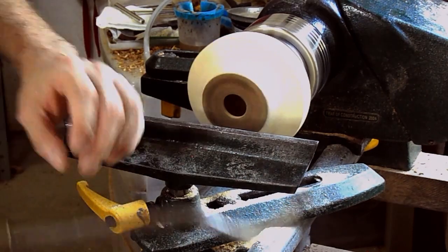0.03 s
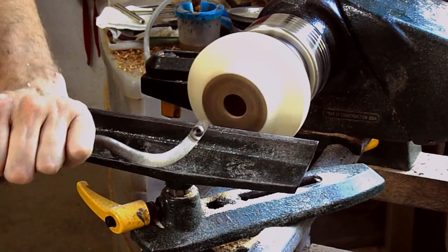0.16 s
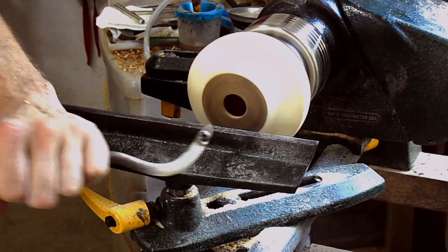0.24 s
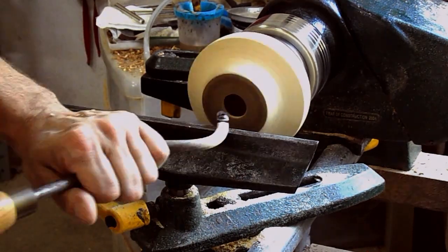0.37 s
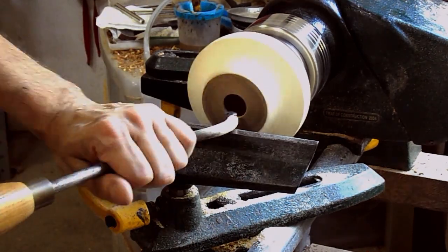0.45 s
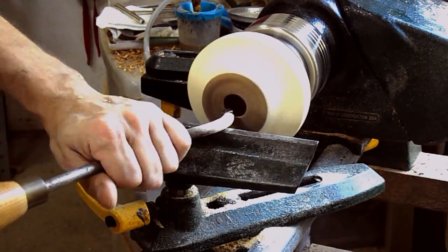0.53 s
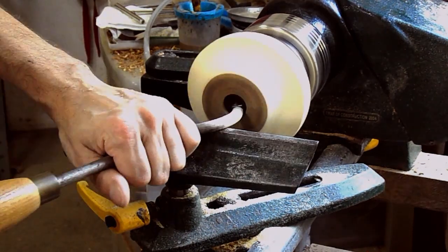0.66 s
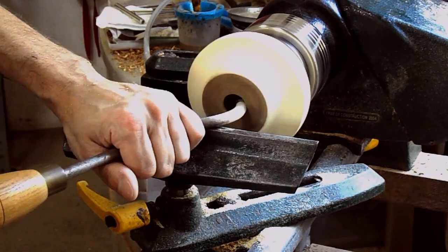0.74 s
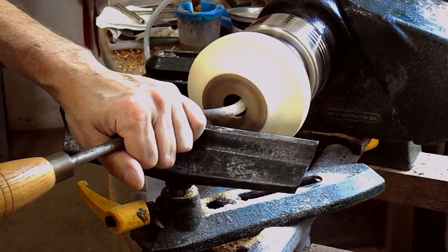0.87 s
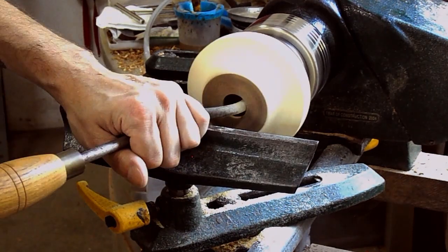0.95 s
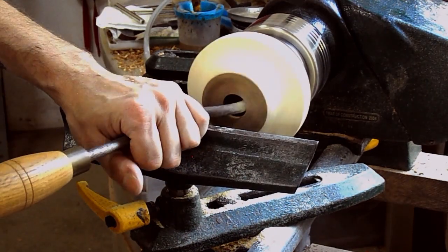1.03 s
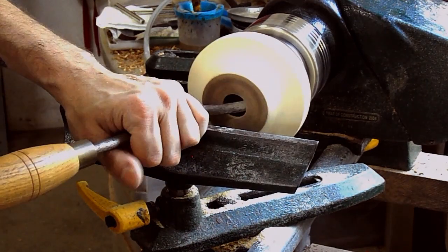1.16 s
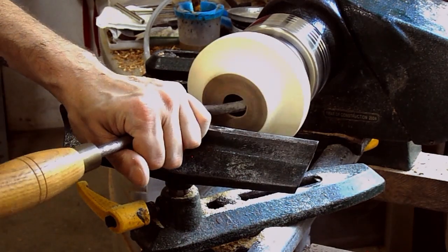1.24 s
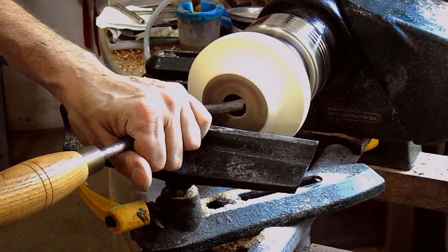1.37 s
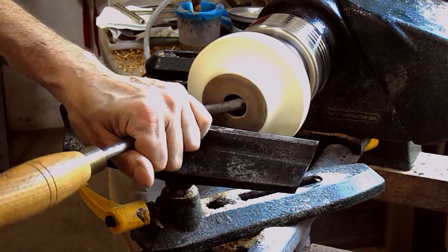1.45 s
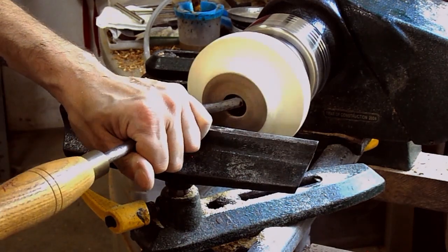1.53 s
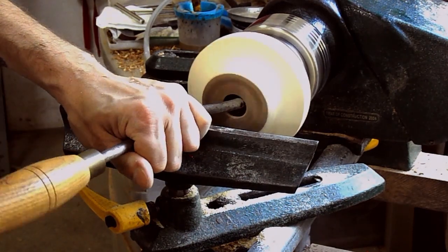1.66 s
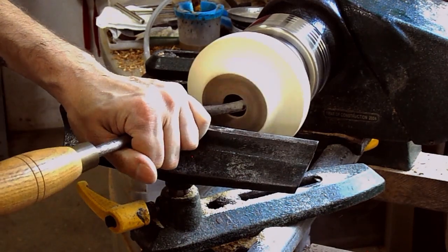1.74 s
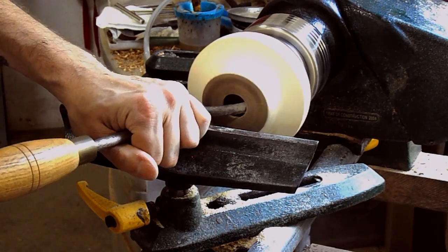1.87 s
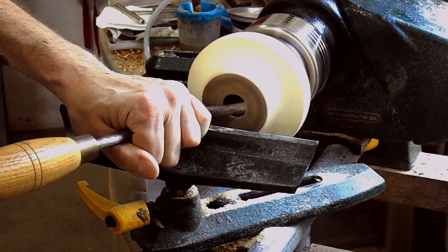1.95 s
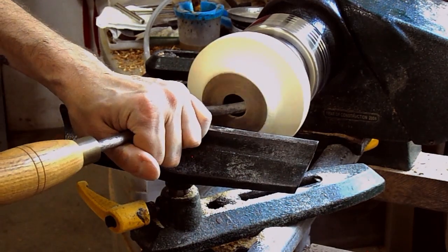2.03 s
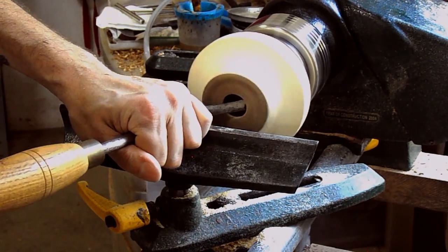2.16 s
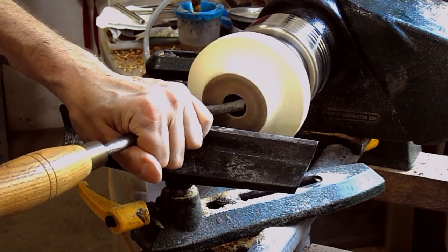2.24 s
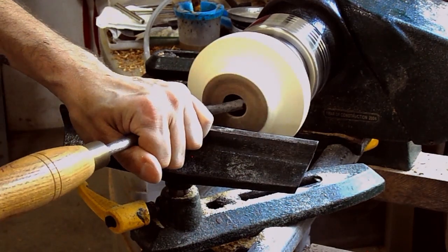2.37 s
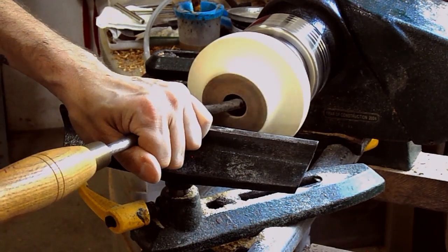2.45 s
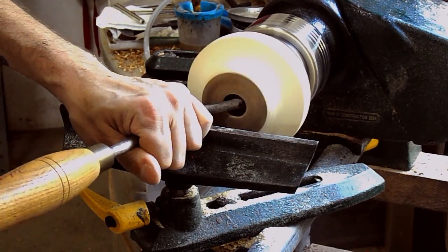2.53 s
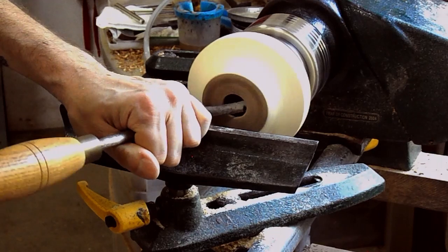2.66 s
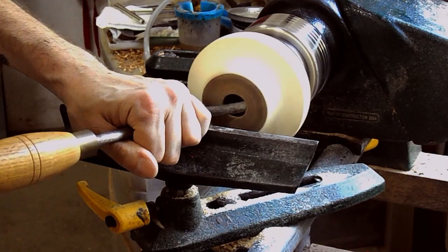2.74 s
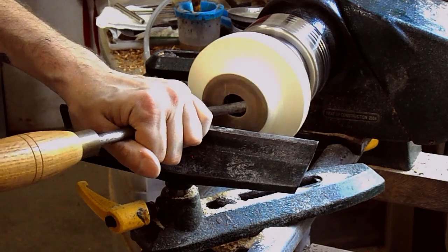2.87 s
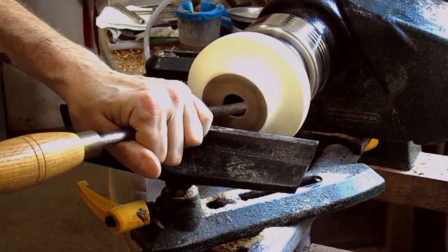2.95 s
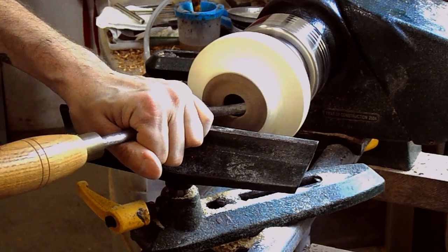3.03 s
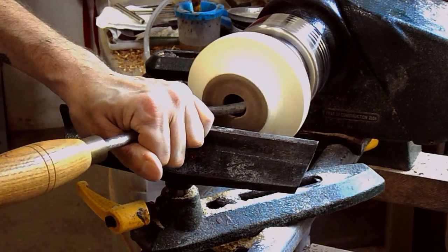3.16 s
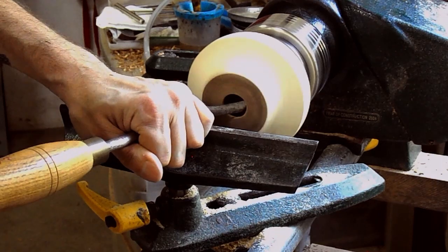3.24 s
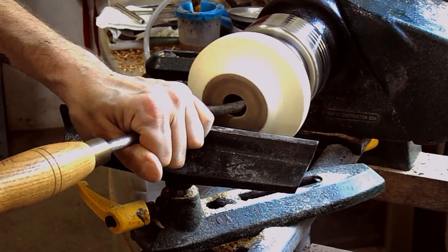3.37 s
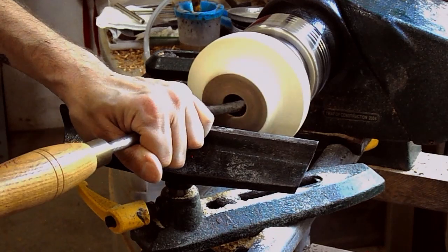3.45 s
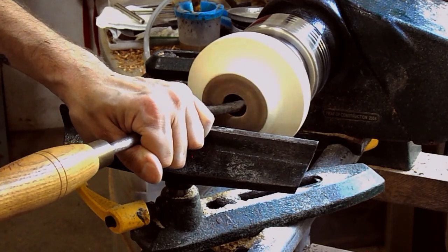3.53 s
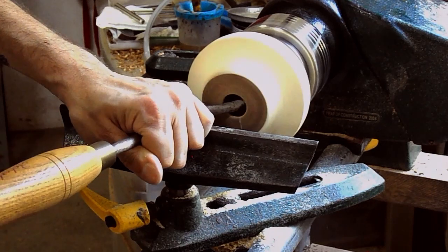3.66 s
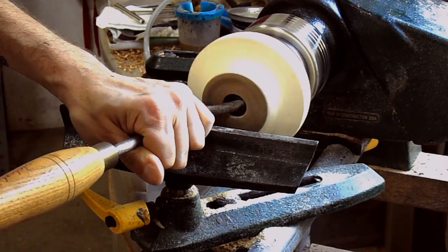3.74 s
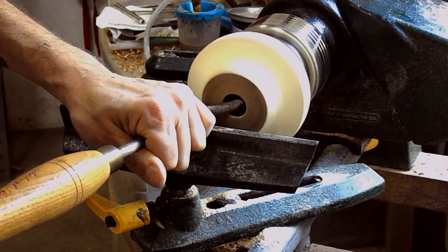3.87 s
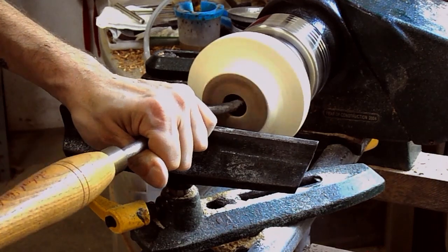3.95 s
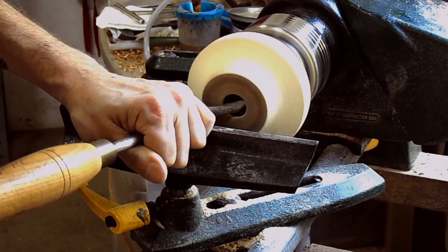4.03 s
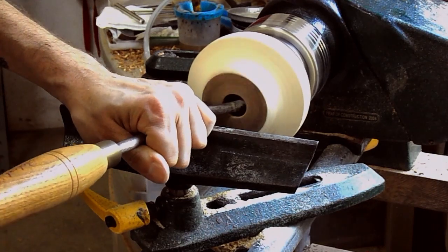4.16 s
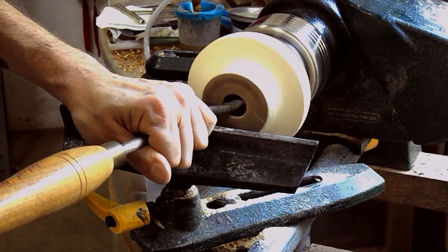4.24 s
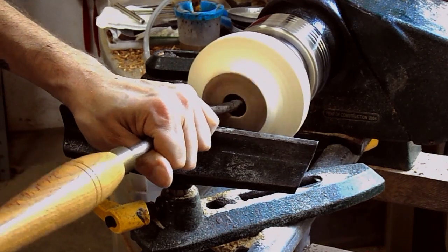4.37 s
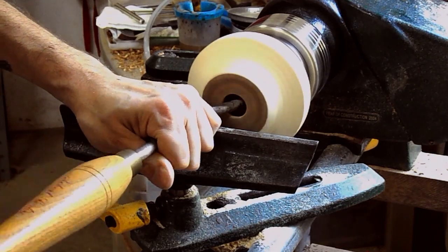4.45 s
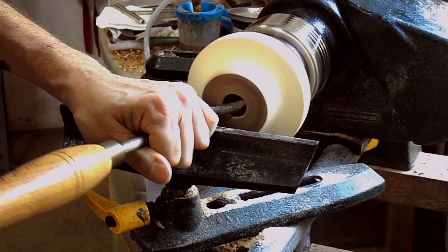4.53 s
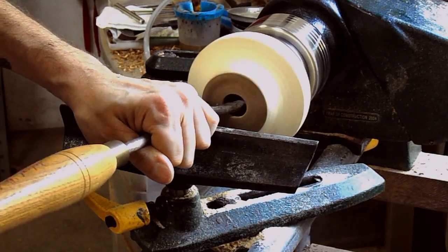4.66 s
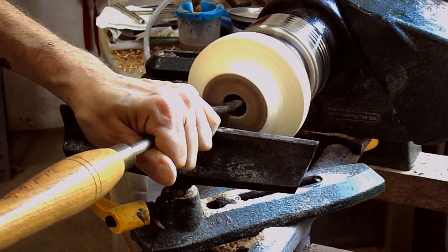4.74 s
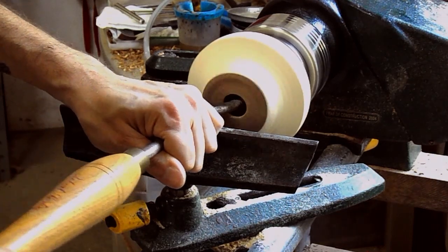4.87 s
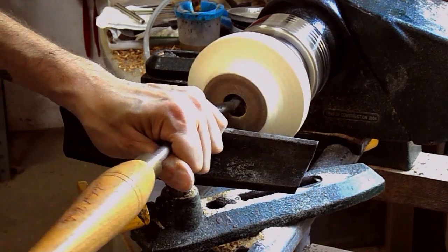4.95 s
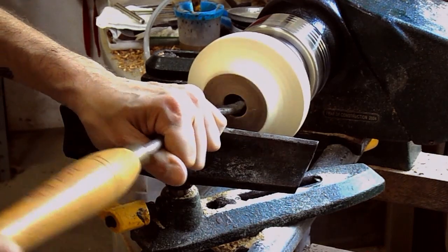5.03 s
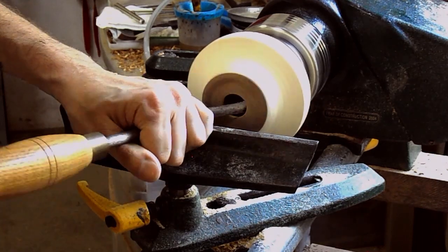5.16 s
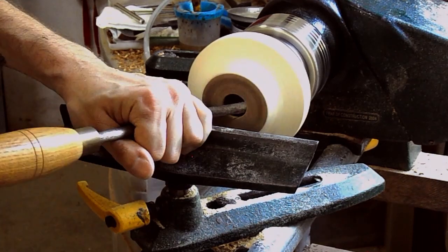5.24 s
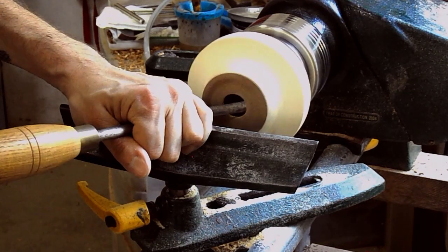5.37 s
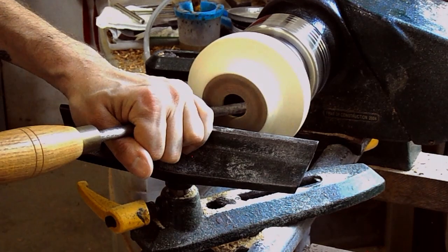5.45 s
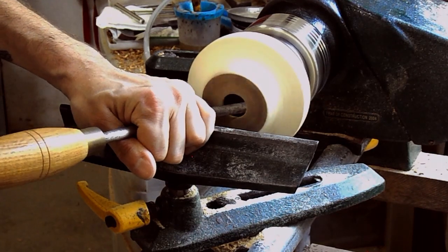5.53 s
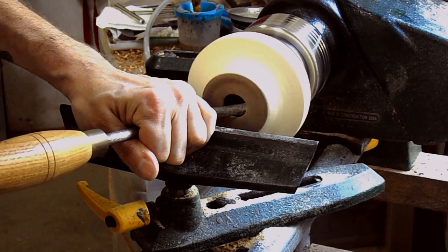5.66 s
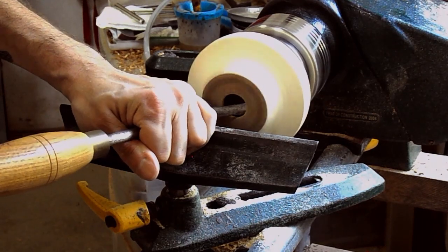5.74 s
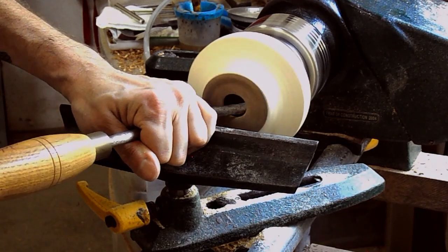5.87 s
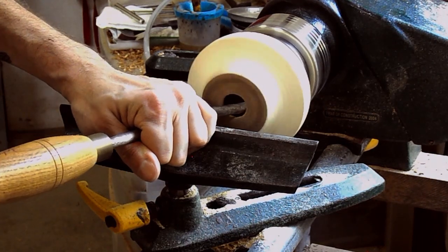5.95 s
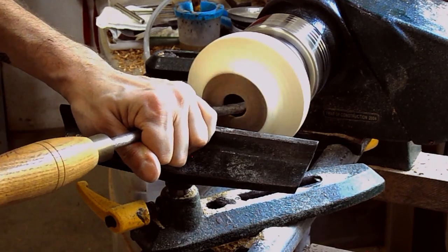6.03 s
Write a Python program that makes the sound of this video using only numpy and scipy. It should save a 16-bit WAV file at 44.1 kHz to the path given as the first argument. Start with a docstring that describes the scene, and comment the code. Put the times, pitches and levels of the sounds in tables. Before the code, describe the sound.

A lathe whirrs steadily while a steel scraper hollows spinning wood in five harsh, rasping, metallic-ringing cuts, with softer rubbing between and after.

```python
"""A hooked steel scraper hollows a wooden vessel spinning on a lathe in a small workshop.
The edge tears fibres in five cuts: dense random snaps that throb with the grain on every turn and ring the steel.
Shavings hiss, chips crackle, the vessel drones and the tool shank chatters through resonances.
Before the third cut and after the last, the tip rubs the wall with a dull rasp; brief notes sing out.
Filtered noise and one thin wavering note make the drive and bearings whirr throughout."""
import sys
import numpy as np
from scipy import signal
from scipy.fft import rfft, irfft, next_fast_len
from scipy.io import wavfile
from scipy.ndimage import uniform_filter1d

SR = 44100
rng = np.random.default_rng(int(sys.argv[2]) if len(sys.argv) > 2 else 0)


def wrap_up_sound(samples):
    """Save the sound to the file named by the first command line argument, as 16-bit audio."""
    columns = np.atleast_2d(samples).T
    # keep every value between -1 and 1, then stretch to whole-number steps
    tamed = np.clip(columns, -1, 1)
    steps = np.round(tamed * 32767).astype(np.int16)
    wavfile.write(sys.argv[1], SR, steps)


N = 268993
TIME = np.arange(N) / SR
SIZE = next_fast_len(N + SR // 2)   # room for the reverb tail
HZ = np.maximum(np.arange(SIZE // 2 + 1) * SR / SIZE, 1)


def from_db(db):
    """Decibels to gain."""
    return 10 ** (np.asarray(db) / 20)


def rms_one(x):
    """Scale to unit power."""
    return x / np.sqrt(np.mean(x ** 2) + 1e-20)


def level(rows, axis=1):
    """Gain in time from a dB column, silent outside its span."""
    rows = np.array(rows)
    inside = (TIME >= rows[:, 0].min()) & (TIME <= rows[:, 0].max())
    return from_db(np.interp(TIME, rows[:, 0], rows[:, axis])) * inside


def at_hz(points):
    """A table joined by straight lines on a log-frequency axis."""
    hz, value = np.transpose(points)
    return np.interp(np.log(HZ), np.log(hz), value)


def filtered(x, response):
    """Pass a signal through a frequency response."""
    return irfft(rfft(x, SIZE) * response, SIZE)[..., :N]


def band(x, low_hz, high_hz, order=2):
    """Causal band-pass."""
    edges = [low_hz, min(high_hz, SR / 2 - 1)]
    return signal.sosfilt(signal.butter(order, edges, "band", fs=SR, output="sos"), x)


def drift(rate):
    """Slow random wander of unit power, smoothed above the rate in Hz."""
    step = 40   # samples between the points of the wander
    r = np.exp(-2 * np.pi * rate * step / SR)
    noise = rng.standard_normal(N // step + 2002)
    slow = signal.lfilter([1], [1, -2 * r, r * r], noise)[2000:]   # drop the settling
    return np.interp(np.arange(N) / step, np.arange(len(slow)), rms_one(slow))


def resonate(force, modes):
    """Parallel resonances with steep skirts; noise shaped by the force drives each one separately."""
    out = 0
    for hz, width_hz, db in modes:
        r = np.exp(-np.pi * width_hz / SR)
        gain = (1 - r * r) / 2
        section = [gain, 0, -gain, 1, -2 * r * np.cos(2 * np.pi * hz / SR), r * r]
        drive = force * rng.standard_normal((2, N))
        out = out + from_db(db) * signal.sosfilt([section, section], drive)
    return out


def steadied(x, span_s, share):
    """Friction limits a vibration: a share of its swells is evened out; unit power."""
    power = uniform_filter1d(x ** 2, size=max(int(span_s * SR), 1))
    return rms_one(x / np.maximum(power, 1e-20) ** (share / 2))


def snaps(per_s, spread_db):
    """Fibres break at random moments; a positive spread makes a few much stronger, a negative one weaker."""
    sizes = from_db(spread_db * np.minimum(rng.exponential(1, N), 3))
    return rms_one(sizes * (rng.random(N) < per_s / SR)) + 1e-9


def scattered(force, response):
    """Snaps reach each side with a sign of their own and take on a colour; unit power."""
    return rms_one(filtered(force * rng.choice([-1, 1], (2, N)), response))


def bursts(rows, length_s, rise_s):
    """Gain in time of sudden onsets that lose 20 dB over their length."""
    gain = np.zeros(N)
    for s, db in rows:
        age = np.maximum(TIME - s + rise_s, 0)
        gain += from_db(db - 20 * age / length_s) * np.minimum(age / rise_s, 1)
    return gain


def swells(rows):
    """Gain in time of touches that rise and fade evenly about their middle."""
    gain = 0
    for s, length_s, db in rows:
        gain = gain + from_db(db) * np.cos(np.pi * np.clip((TIME - s) / length_s, -.5, .5))
    return gain


# headstock and bed resonances: f/Hz, width of each of two filter passes/Hz, relative level/dB
HEADSTOCK_MODES = [(165, 50, -18.5), (263, 30, -8.5), (325, 32, -5), (358, 45, -1), (395, 50, -6.5),
                   (446, 22, 2), (480, 50, -11), (552, 55, -8), (655, 45, -11.5), (757, 35, -10),
                   (850, 60, -10), (940, 80, -6), (984, 22, -1), (1043, 42, -2), (1200, 120, -19),
                   (1500, 130, -23), (1760, 110, -17), (1930, 110, -13), (2080, 90, -14), (2450, 90, -26),
                   (2680, 90, -27), (3400, 110, -24), (3620, 70, -21), (4020, 70, -19), (4160, 120, -14.5),
                   (4330, 80, -19), (4520, 180, -17), (4720, 140, -21)]
# bearing and air hiss: f/Hz, relative density/dB
HISS_COLOUR = [(60, -30), (150, -10.5), (500, 6), (1200, 7.5), (1500, 7), (2400, 2), (3400, 1.5), (4800, 3),
               (5500, 2.5), (6400, 4), (8500, 2), (11500, 0), (13300, -3), (15500, -3)]
# the running lathe swells and sinks, whine included: t/s, level offset/dB
LATHE_SWELL = [(0, 2), (.25, -2), (.4, 2), (.5, -2), (.62, 2.5), (.77, -3), (.9, 0.5), (1.28, 2),
               (1.78, -2), (2.05, 2), (2.75, 0), (5.25, -1.5), (6.1, 1.5)]
WHIRR_DB, HISS_DB, RUMBLE_DB = -41.5, -45, -69.0


def lathe():
    """The drive shakes the headstock; bearings and stirred air hiss over a faint uneven rumble."""
    shaking = resonate(from_db(2.4 * drift(17)), HEADSTOCK_MODES)
    whirr = steadied(shaking, span_s=0.14, share=0.7)
    hiss = rms_one(filtered(rng.standard_normal((2, N)), from_db(at_hz(HISS_COLOUR))))
    rumble = rms_one(band(rng.standard_normal((2, N)), low_hz=30, high_hz=150))
    return (whirr * from_db(WHIRR_DB + np.interp(TIME, *np.transpose(LATHE_SWELL)))
            + hiss * from_db(HISS_DB + .5 * drift(22))
            + rumble * from_db(RUMBLE_DB + 4.3 * drift(6.7)))


# thin drive note: f/Hz, level/dB, pitch waver/Hz
DRIVE_WHINE = (984, -49.5, 1.93)


def whining():
    """One thin note from the drive, wavering separately in level and phase on each side."""
    hz, db, waver_hz = DRIVE_WHINE
    phase = 2 * np.pi * np.cumsum(hz + waver_hz * drift(5.6)) / SR
    sides = [from_db(2.5 * drift(9)) * np.sin(phase + .7 * drift(3)) for side in range(2)]
    return from_db(db + np.interp(TIME, *np.transpose(LATHE_SWELL))) * np.array(sides)


SHOP_T60_S = 0.12


def workshop(x, wet_db):
    """Dense, short reflections from the machine and the close walls, unlike on the two sides."""
    age = TIME[:SR // 2]
    tail = rng.standard_normal((2, len(age))) * from_db(-60 * age / SHOP_T60_S) * (age > .002)
    tail /= np.sqrt(np.sum(tail ** 2, axis=1, keepdims=True))
    dulled = rfft(tail, SIZE) / np.hypot(1, HZ / 9000)
    return x + from_db(wet_db) * filtered(x, dulled)


TURNS_PER_S = 16.6
# hard and soft grain around the wall: throb depth/dB at one, two, three and four times a turn
GRAIN_THROB = [0.96, 0.75, 1, 0.94]


def wall_grain(uneven_db):
    """The pressure on the edge repeats with each turn, and never quite alike."""
    turn = 2 * np.pi * np.cumsum(TURNS_PER_S * (1 + 0.015 * drift(4.4))) / SR
    pattern = 0
    for k, db in enumerate(GRAIN_THROB, 1):
        pattern = pattern + db * np.cos(k * turn + rng.uniform(0, 2 * np.pi))
    return rms_one(from_db(pattern + uneven_db * drift(67)))


# five cuts, and how hard the edge bites in each: t/s, bite level/dB
CUT_BITES = [
    [(1.34, -60), (1.368, -37), (1.402, -32.5), (1.412, -41.5), (1.452, -25.5), (1.522, -27.5),
     (1.538, -38.5), (1.564, -38.5), (1.616, -26), (1.638, -38.5), (1.68, -34.5), (1.72, -81)],
    [(2.2, -48), (2.23, -36), (2.256, -44), (2.266, -28), (2.314, -35.5), (2.324, -27), (2.35, -35.5),
     (2.406, -27.5), (2.494, -27.5), (2.5, -27.5), (2.602, -28), (2.66, -61)],
    [(3.41, -60), (3.446, -25.5), (3.452, -31.5), (3.704, -26.5), (3.738, -30.5), (3.766, -24.5),
     (3.79, -29.5), (3.894, -24.5), (3.92, -32.5), (3.958, -25.5), (4.038, -44.5), (4.06, -74)],
    [(4.11, -67), (4.122, -42), (4.166, -26), (4.202, -33), (4.252, -25.5), (4.374, -28.5), (4.404, -33),
     (4.416, -30.5), (4.434, -35), (4.538, -38.5), (4.59, -81)],
    [(4.61, -54), (4.638, -34.5), (4.652, -27.5), (4.66, -30), (4.762, -24.5), (4.814, -32), (4.834, -28.5),
     (4.884, -33), (5.002, -39.5), (5.07, -87)],
]
# one row a cut: vessel hum trim/dB, shank chatter trim/dB, shavings trim/dB,
# growth of rasp and shavings as the handle swings/(dB per s)
CUT_TRIMS = [(-2, 1.5, -2.5, 24), (2.5, 0.5, -1.5, 2), (-0.5, 1, -1.5, 4), (0.5, -1, 2, 18),
             (0, -1, 3.5, 26)]
FULL_BITE_DB = -23


def bite(follows, trims_db=0, growths_db_per_s=0):
    """Gain growing as a power of the bite, 1 at full bite; each cut may trim it and tilt it about its middle."""
    trims_db = np.broadcast_to(trims_db, len(CUT_BITES))
    growths_db_per_s = np.broadcast_to(growths_db_per_s, len(CUT_BITES))
    gain = 0
    for cut, trim_db, growth in zip(CUT_BITES, trims_db, growths_db_per_s):
        middle_s = (cut[0][0] + cut[-1][0]) / 2
        strength = (level(cut) / from_db(FULL_BITE_DB)) ** follows
        gain = gain + strength * from_db(trim_db + growth * (TIME - middle_s))
    return gain


# the tip glides on the wall, before the trims below: t/s, friction level/dB, knocking level/dB
WALL_RUBS = [
    [(2.82, -70, -65), (2.856, -47, -38), (3.092, -48, -34.5), (3.178, -51, -49), (3.194, -51, -45),
     (3.21, -53, -61), (3.272, -46, -37.5), (3.426, -39, -33), (3.45, -51, -51)],
    [(5.33, -59, -49.5), (5.394, -41.5, -33.5), (5.456, -37, -39), (5.5, -43.5, -34), (5.876, -43.5, -35.5),
     (5.922, -47.5, -47), (5.978, -47.5, -42.5), (6.068, -48, -64), (6.1, -48, -49)],
]
RUB_RASP_DB, RUB_DUST_DB, RUB_DRONE_DB, RUB_CHATTER_DB = 1, -5.5, -0.5, -10


def gliding():
    """Gains of the friction and of the knocking while the tip glides on the wall."""
    return [sum(level(rub, axis=k) for rub in WALL_RUBS) for k in (1, 2)]


# brief notes, each in one resonance: middle t/s, length/s, f/Hz, width/Hz, level/dB
SUNG_NOTES = [(.39, .028, 3500, 700, -45), (1.617, .045, 3730, 90, -32), (2.915, .045, 3420, 260, -47),
              (3.805, .14, 4320, 45, -31), (4.504, .08, 2560, 500, -37), (4.786, .21, 4335, 25, -35),
              (4.98, .12, 2550, 330, -40), (5.4, .1, 261, 22, -36), (5.455, .05, 3150, 450, -33),
              (5.477, .14, 329, 26, -33), (5.675, .13, 323, 20, -35), (5.7, .28, 536, 14, -39),
              (5.704, .09, 640, 16, -39), (5.833, .23, 420, 11, -27), (5.989, .12, 421, 7, -35)]


def singing():
    """Sticking and slipping makes tool or vessel sing: notes swell and fade, uneven slips waver the pitch."""
    out = np.zeros((2, N))
    for s, length_s, hz, width_hz, db in SUNG_NOTES:
        on = np.abs(TIME - s) < length_s / 2
        age = TIME[on] - s
        phase = 2 * np.pi * np.cumsum(hz + width_hz / 2 * drift(width_hz)[on]) / SR
        paths = rng.uniform(0, 2 * np.pi, (2, 1))   # a phase of its own on each side
        out[:, on] += from_db(db) * np.cos(np.pi * age / length_s) * np.sin(phase + paths)
    return out


SETTLE_S = 0.059   # averaging time of the load


def settled(gain):
    """A load evened out by the inertia of the vessel and the tool."""
    return uniform_filter1d(gain, size=max(int(SETTLE_S * SR), 1))


# hollow vessel resonances: f/Hz, width of each of two filter passes/Hz, relative level/dB
VESSEL_MODES = [(226, 34, -14.5), (260, 66, -3.5), (290.5, 65, -5.5), (338, 49, 1), (362, 41, -7.5),
                (410, 96, -2), (481, 99, -5), (550, 43, -1), (660, 53, -4), (760.4, 31, -5.5),
                (856, 150, -12), (961.4, 55, -2), (1130, 190, -20), (1155, 37, -10), (1250, 31, -6)]
# overhanging tool shank resonances: same columns
SHANK_MODES = [(417, 26, 0), (434, 26, 0), (455, 40, -5)]
# the tip feels for the wall and the vessel hums: middle t/s, length/s, level/dB
WALL_GRAZES = [(1.28, 0.12, -45), (2.06, 0.21, -43.5), (2.21, .13, -47.5)]
# level at full bite before trims/dB, and dB gained per dB of bite
DRONE_DB, DRONE_FOLLOWS = -31, 0.7
CHATTER_DB, CHATTER_FOLLOWS = -26, 1


def droning(grain):
    """Bumps in the wall knock the vessel and set the overhanging shank chattering."""
    force = grain * snaps(per_s=900, spread_db=4.0)
    vessel = steadied(resonate(force, VESSEL_MODES), span_s=.04, share=0.85)
    shank = steadied(resonate(force, SHANK_MODES), span_s=0.018, share=0.65)
    _, knocking = gliding()
    hums_db, chatters_db, *_ = np.transpose(CUT_TRIMS)
    drone = from_db(DRONE_DB) * settled(bite(DRONE_FOLLOWS, hums_db))
    drone = drone + from_db(RUB_DRONE_DB) * knocking + swells(WALL_GRAZES)
    chatter = from_db(CHATTER_DB) * settled(bite(CHATTER_FOLLOWS, chatters_db))
    chatter = chatter + from_db(RUB_CHATTER_DB) * knocking
    return drone * vessel + chatter * shank


# colour of the rubbing tip: f/Hz, relative density/dB
FRICTION_COLOUR = [(200, -32), (500, -18), (900, 7.5), (1450, 4.5), (2100, 7.5), (2400, 4.5), (3100, 4),
                   (3900, -13), (4900, -2), (5400, -6), (5900, 4.5), (7500, -18), (10000, -18),
                   (15500, -28)]
# dry scratch of a skipping tip: f/Hz, relative density/dB
SCRATCH_COLOUR = [(1200, -41), (2100, -7), (2600, -2.5), (3200, 1.5), (3800, -1), (5000, -10), (7800, -9.5),
                  (10000, -39)]
# the tip skips and scuffs the wood, also as it leaves a cut: middle t/s, length/s, level/dB
TIP_SCUFFS = [(3.362, 0.032, -33.5), (4.5, 0.1, -44), (4.95, 0.14, -54), (5.4, 0.085, -43),
              (5.455, 0.037, -39), (5.785, 0.049, -39), (5.81, .018, -34.5), (5.862, 0.032, -31),
              (5.889, .018, -35)]
RASP_DB, RASP_FOLLOWS = -35, 0.55   # at full bite mid-cut/dB, dB gained per dB of bite


def rubbing(grain):
    """The tip and loose shavings slide over the wall with a dull rasp; where the tip skips it scratches."""
    force = grain * snaps(per_s=6000, spread_db=3)
    rasp = scattered(force, from_db(at_hz(FRICTION_COLOUR)))
    scratch = scattered(force, from_db(at_hz(SCRATCH_COLOUR)))
    friction, _ = gliding()
    *_, swings = np.transpose(CUT_TRIMS)
    pressure = from_db(RASP_DB) * bite(RASP_FOLLOWS, growths_db_per_s=swings)
    pressure = pressure + from_db(RUB_RASP_DB) * friction
    return pressure * rasp + swells(TIP_SCUFFS) * scratch


# the edge catches and frees a chip: end of rise t/s, level before decay/dB
CHIP_CATCHES = [(1.452, -18), (2.264, -37), (2.42, -23.5), (2.473, -18), (2.558, -20), (3.7614, -25.5),
                (3.898, -27), (4.6366, -25)]
# a flying splinter ticks against metal: same columns
SPLINTER_TICKS = [(4.152, -22)]
CHIP_S, TICK_S = 0.032, .004   # time to lose 20 dB


def chips():
    """Each catch is a short burst of sparser snaps; a splinter gives a tiny bright tick."""
    colour = from_db(at_hz(TEAR_COLOUR)) / np.hypot(1, 1800 / HZ)   # thinner below 1800 Hz
    crackle = scattered(snaps(per_s=1700, spread_db=-1.0), colour)
    tick = rms_one(band(rng.standard_normal((2, N)), low_hz=11000, high_hz=16000))
    return (bursts(CHIP_CATCHES, CHIP_S, rise_s=0.002) * crackle
            + bursts(SPLINTER_TICKS, TICK_S, rise_s=.0005) * tick)


# colour of spraying shavings: f/Hz, relative density/dB
SHAVINGS_COLOUR = [(1000, -24), (4000, 13), (6000, -43), (8500, 0.5), (10000, 5), (12000, 5), (13500, 3),
                   (15500, 1)]
SPRAY_DB, SPRAY_FOLLOWS = -32, 0.93   # at full bite before trims/dB, dB gained per dB of bite
SPRAY_SNAPS_PER_S = 14000
WHIRL_S = .04   # time constant of shavings staying in the hollow


def spraying(grain):
    """Fine shavings of similar size hiss off the edge and whirl in the hollow; rubbing stirs a little dust."""
    force = grain * snaps(SPRAY_SNAPS_PER_S, spread_db=1)
    keep = np.exp(-1 / (WHIRL_S * SR))
    _, _, shavings_db, swings = np.transpose(CUT_TRIMS)
    thrown = bite(SPRAY_FOLLOWS, shavings_db, swings)
    whirling = signal.lfilter([1 - keep], [1, -keep], thrown)
    friction, _ = gliding()
    flow = from_db(SPRAY_DB) * np.sqrt(thrown * whirling) + from_db(RUB_DUST_DB) * friction
    return flow * scattered(force, from_db(at_hz(SHAVINGS_COLOUR)))


# colour of tearing fibres: f/Hz, relative density/dB
TEAR_COLOUR = [(200, -44), (450, 10.5), (700, -3.5), (1200, 0), (1450, -5), (1850, 2), (2450, -3.5),
               (3000, 3), (3500, 0.5), (4900, 1.5), (5400, -2.5), (7700, -1), (9800, -9), (15500, -20)]
# steel tool and rest resonances: f/Hz, width of each of two filter passes/Hz, relative level/dB
STEEL_MODES = [(1570, 50, -11), (1830, 100, -4), (2095, 120, -4), (2450, 160, -11), (2740, 90, -10),
               (2970, 150, -8), (3095, 45, -4.5), (3230, 70, -9.5), (3432, 65, -6), (3696, 75, -4),
               (3875, 55, -4), (4015, 80, 0), (4145, 100, -2), (4332, 35, 3), (4430, 120, -5),
               (4590, 110, -4), (4700, 70, -5.5), (4788, 55, -1), (4960, 90, -5), (5118, 40, -2.5),
               (5900, 300, -9), (6670, 70, -10), (7285, 35, -6.5), (7560, 200, -13), (8150, 300, -14),
               (8900, 300, -16)]
# level at full bite/dB, and dB gained per dB of bite
TEAR_DB, TEAR_FOLLOWS = -23, 0.94
RING_DB, RING_FOLLOWS = -19.5, 2.14


def cutting(grain):
    """Thousands of fibres snap each second; the snaps rasp directly and ring the steel."""
    force = grain * snaps(per_s=7000, spread_db=-2.0)
    tearing = scattered(force, from_db(at_hz(TEAR_COLOUR)))
    ringing = steadied(resonate(force, STEEL_MODES), span_s=0.025, share=1.0)
    return (from_db(TEAR_DB) * bite(TEAR_FOLLOWS) * tearing
            + from_db(RING_DB) * bite(RING_FOLLOWS) * ringing)


# stereo balance: f/Hz, left minus right level/dB
STEREO_BALANCE = [(60, -5), (110, -1.5), (200, -5), (380, -2), (700, -3), (1290, -2.5), (2380, -4.5),
                  (4400, -4), (8120, -1), (15000, -0.5)]


def scene():
    """Tool sounds in the workshop over the running lathe, all a little to the right."""
    grain = wall_grain(uneven_db=0.5)
    edge = cutting(grain) + spraying(grain) + chips()
    contact = rubbing(grain) + droning(grain) + singing()
    both = workshop(edge + contact, wet_db=-8) + lathe() + whining()
    halves = np.array([[.5], [-.5]])   # left and right share the difference
    return filtered(both, from_db(at_hz(STEREO_BALANCE) * halves))


CUTOFF_HZ = 15850


def record(dry):
    """The microphone thins the bass; the top is cut steeply."""
    thin = signal.sosfilt(signal.butter(2, 110, "high", fs=SR, output="sos"), dry)
    return filtered(thin, 1 / np.hypot(1, (HZ / CUTOFF_HZ) ** 150))


dry = scene()
out = record(dry)
wrap_up_sound(out)
```